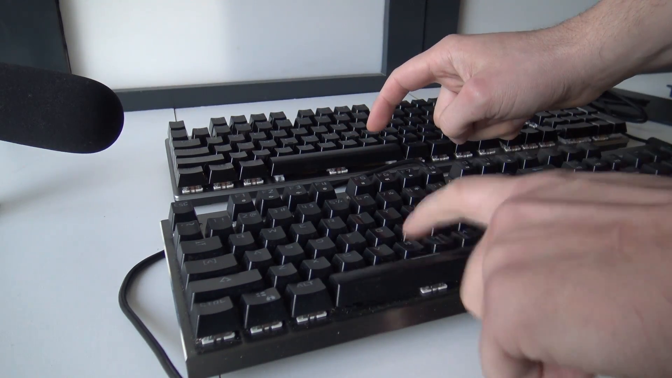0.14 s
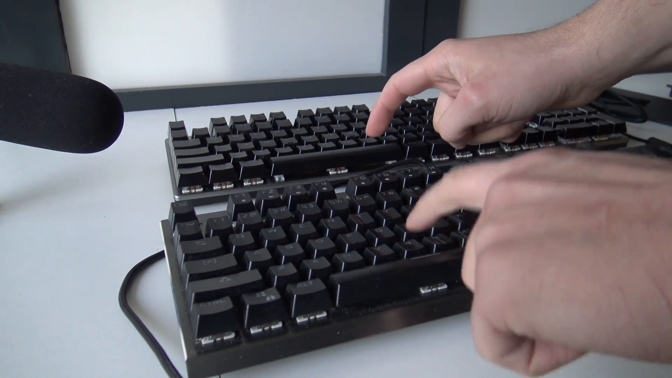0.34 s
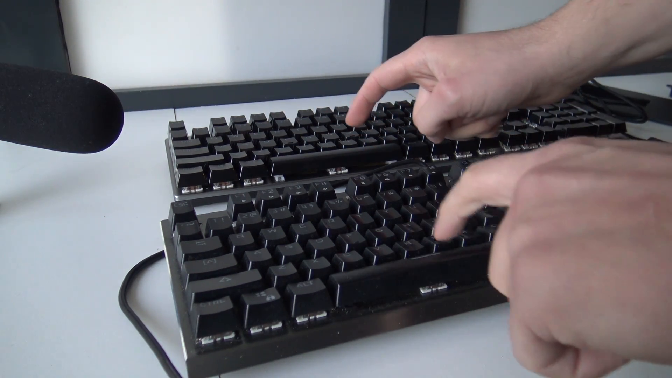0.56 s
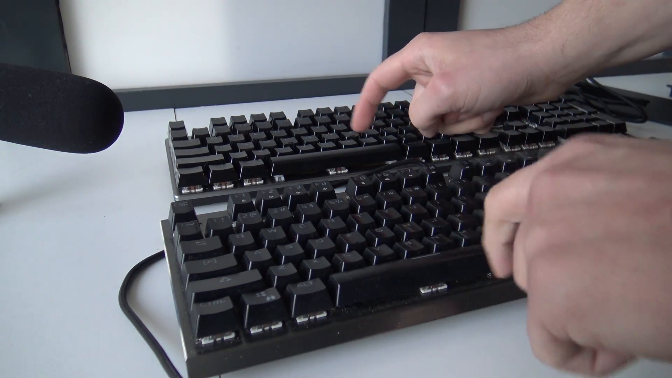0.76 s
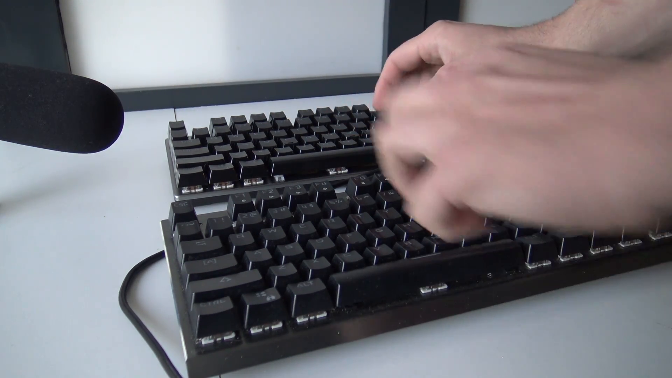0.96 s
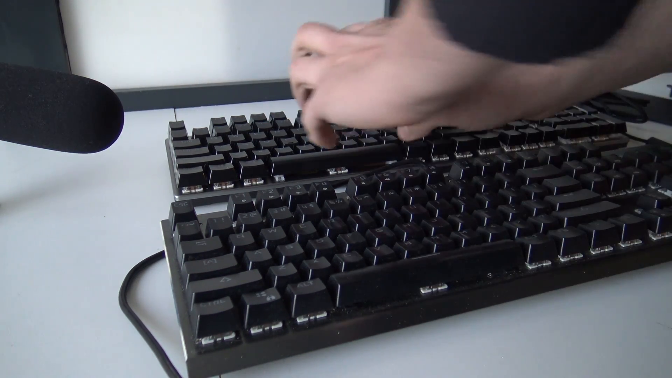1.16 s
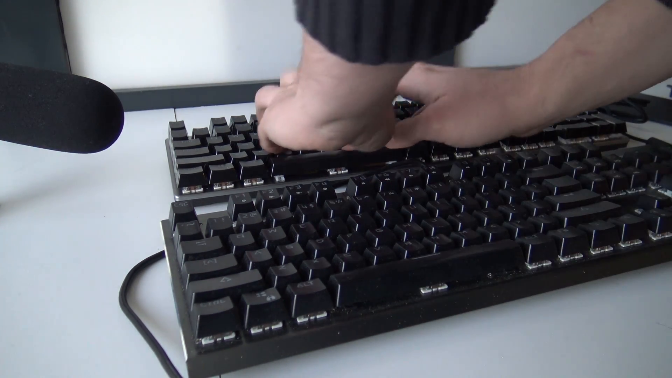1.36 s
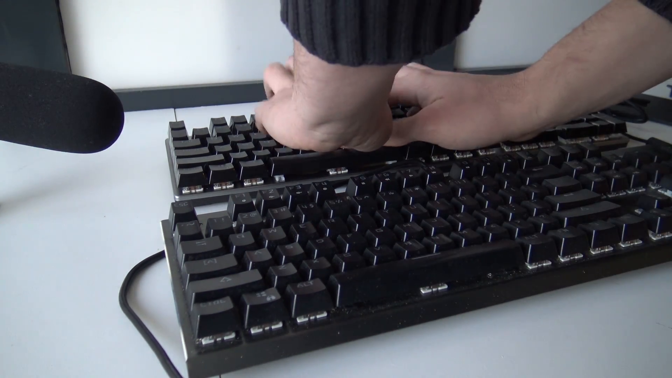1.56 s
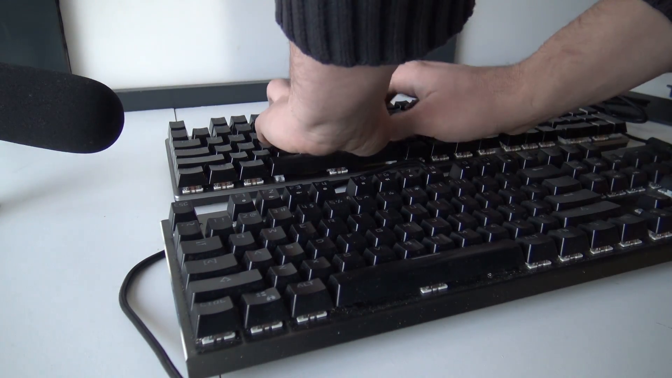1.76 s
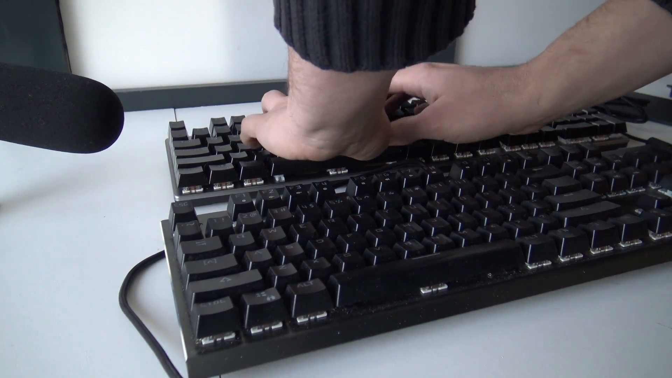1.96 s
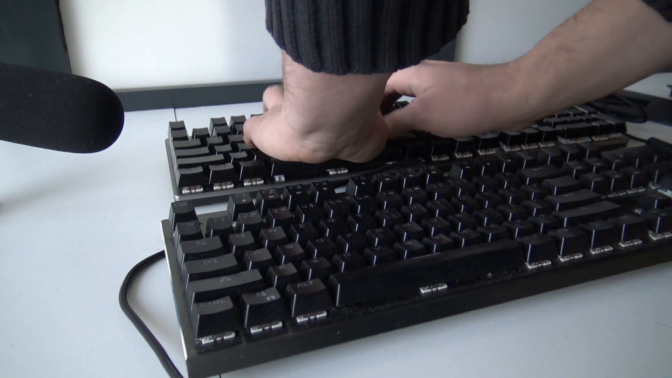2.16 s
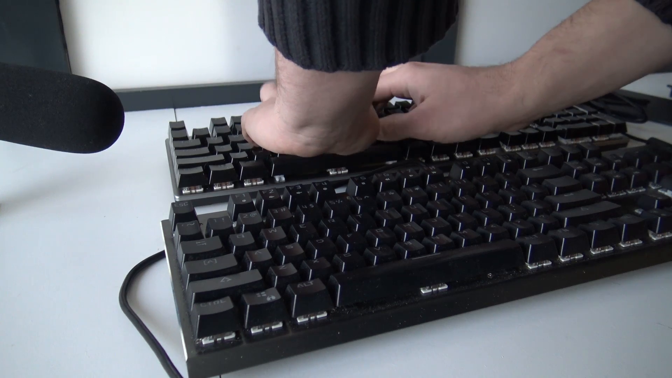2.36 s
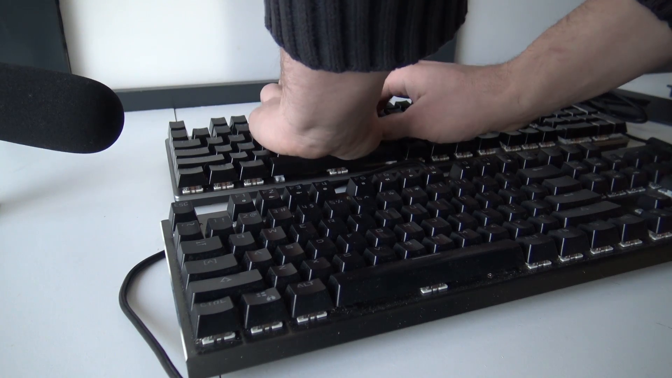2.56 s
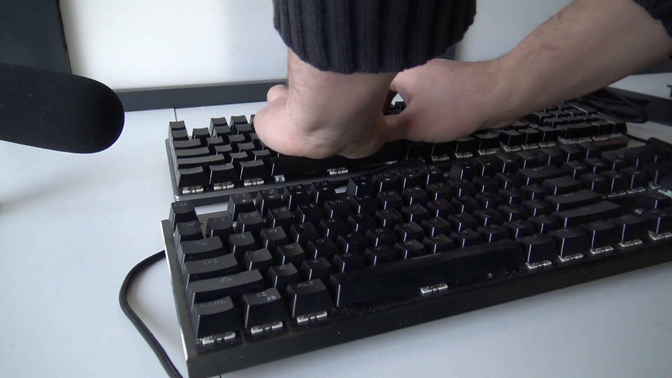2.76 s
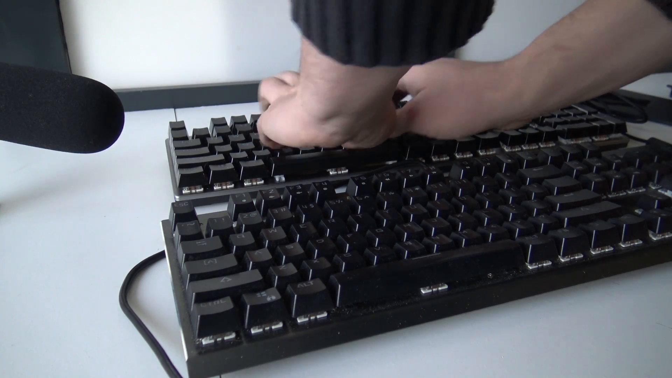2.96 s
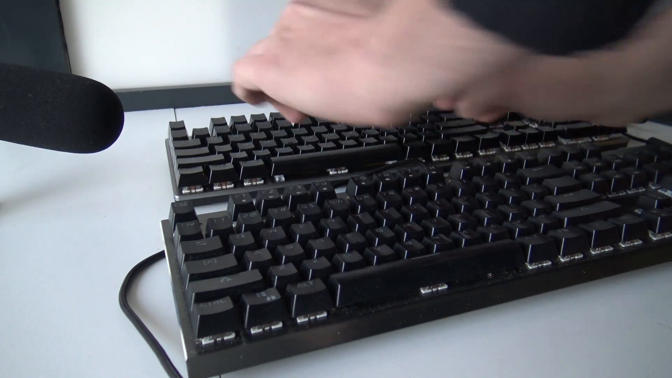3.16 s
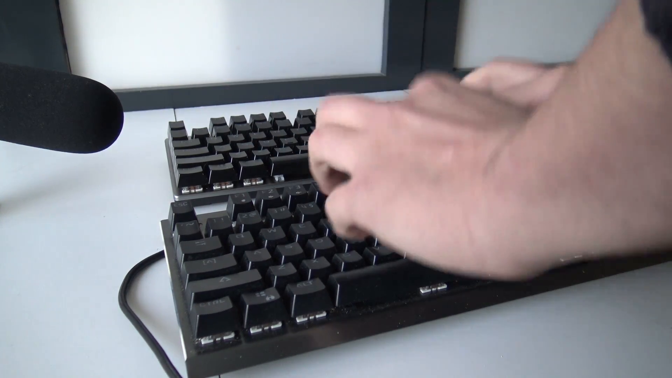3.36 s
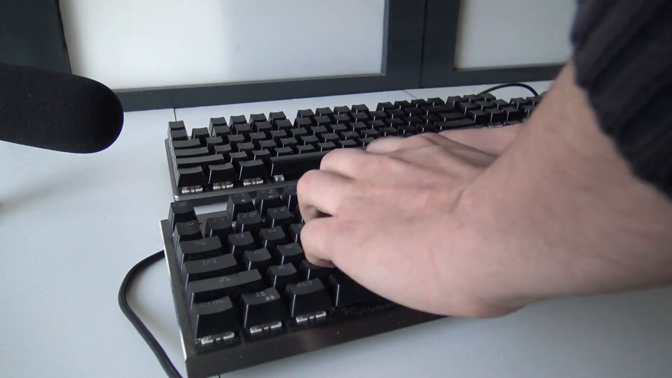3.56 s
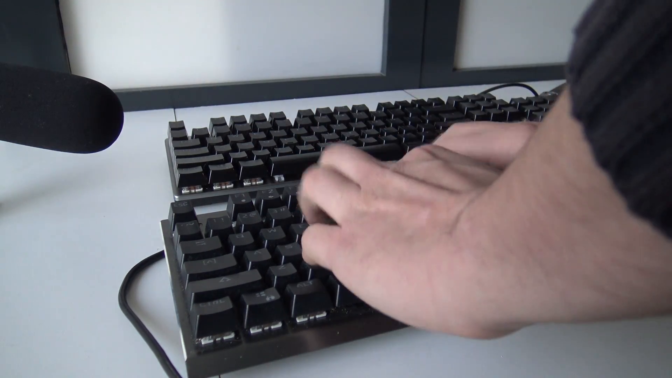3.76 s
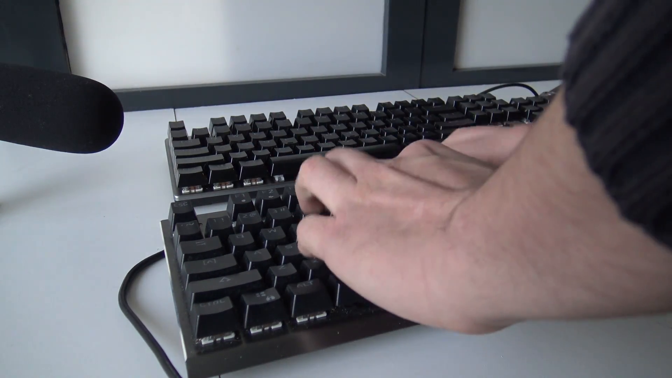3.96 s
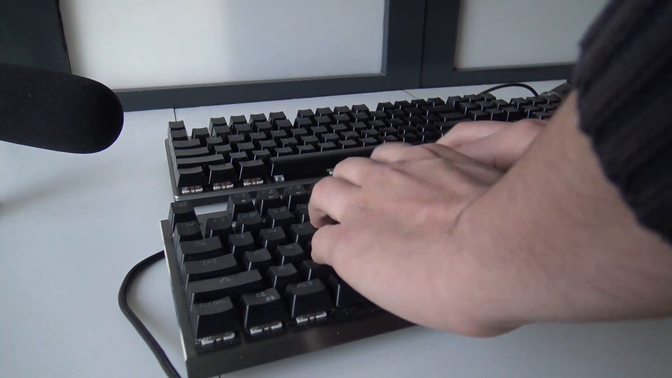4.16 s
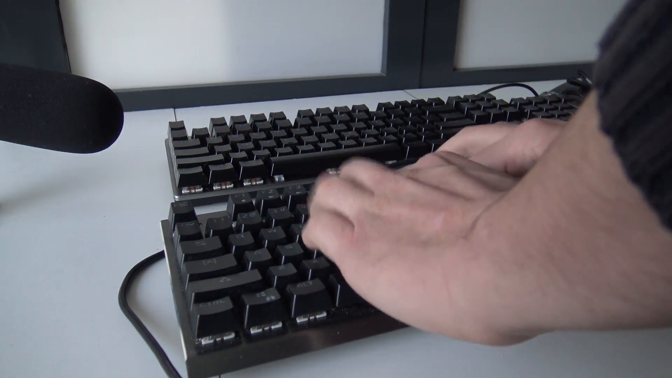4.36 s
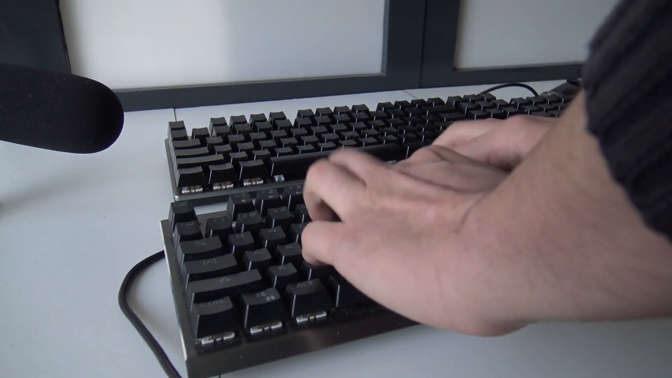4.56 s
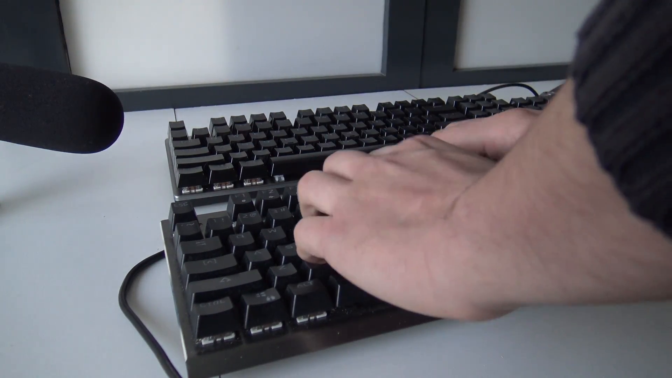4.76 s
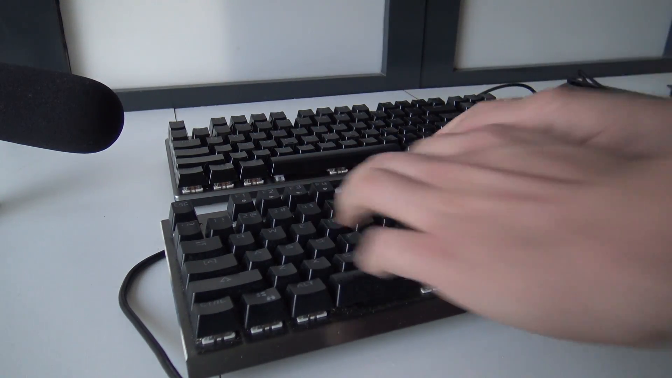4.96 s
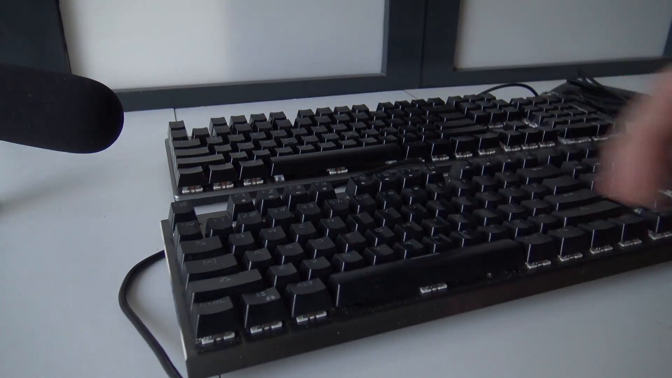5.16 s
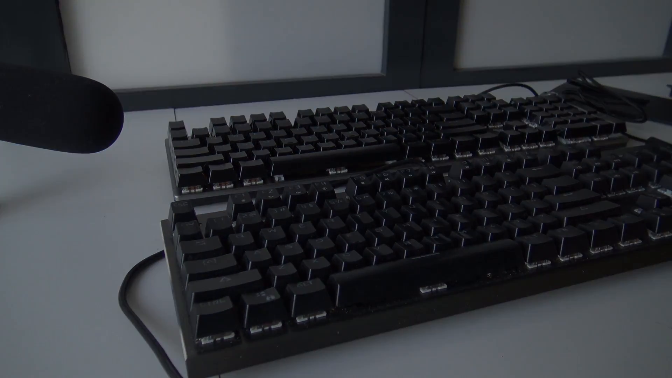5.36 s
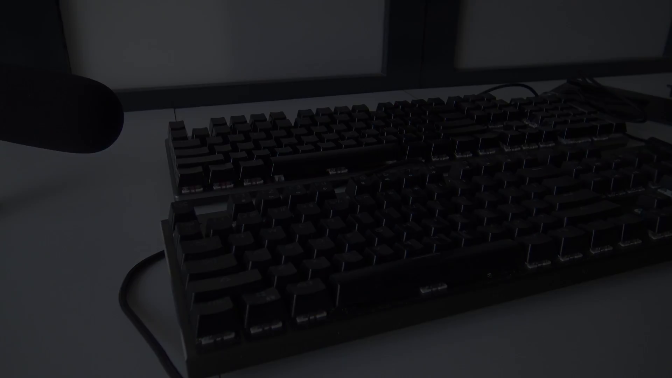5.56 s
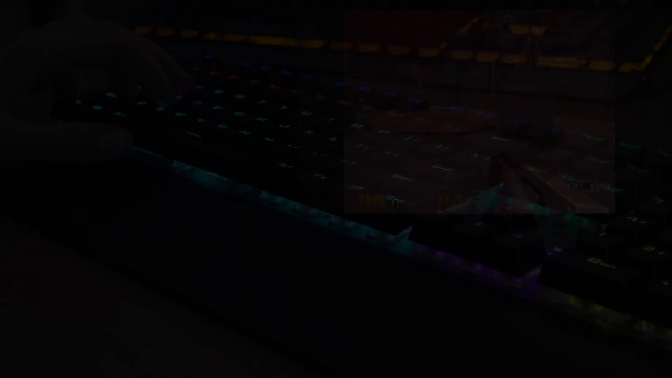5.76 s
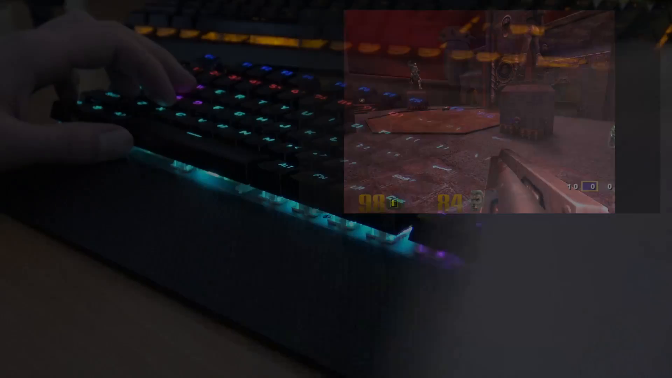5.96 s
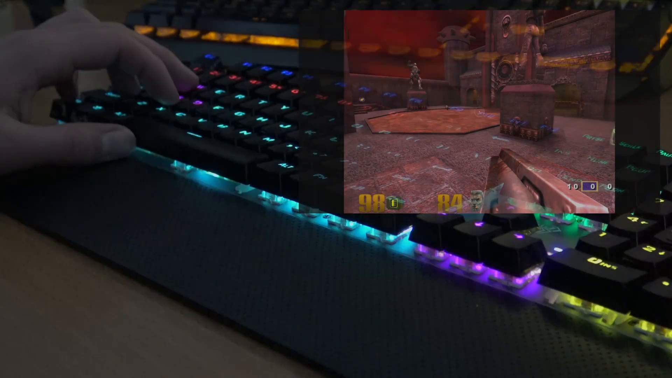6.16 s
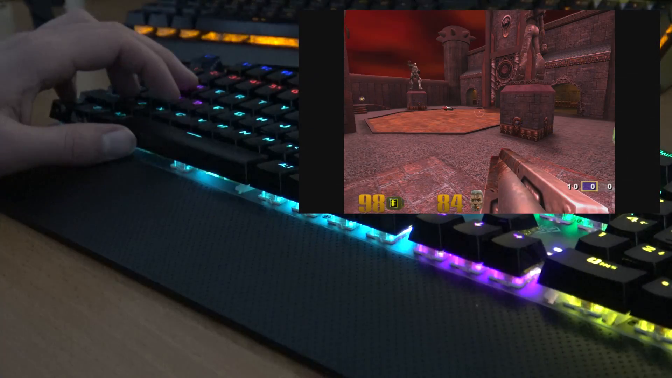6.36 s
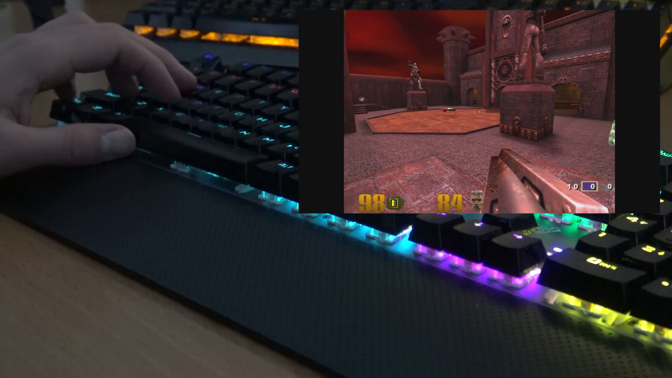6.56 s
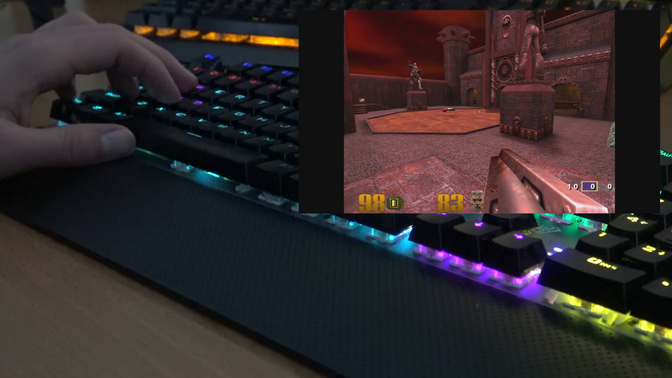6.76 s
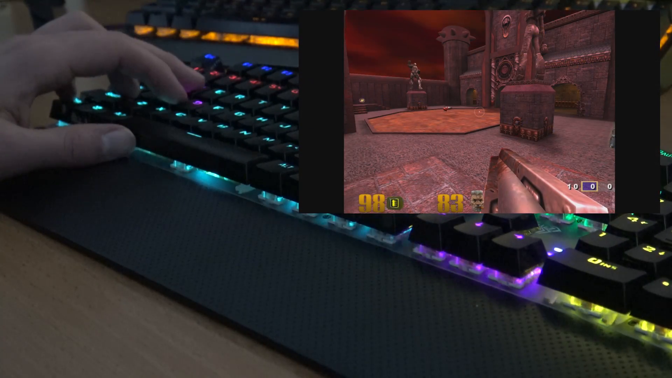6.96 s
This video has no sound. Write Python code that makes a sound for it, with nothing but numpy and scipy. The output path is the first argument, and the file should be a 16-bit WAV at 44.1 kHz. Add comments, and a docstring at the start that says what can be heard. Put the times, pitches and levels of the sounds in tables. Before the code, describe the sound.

Two hard, loud space-bar taps crack close to the microphone, each with a spring-back and desk thump. After a pause, rapid typing clatters on a duller, more distant keyboard. Another short gap, then fast, crisp typing on a nearer clicky board, with one notably heavy stroke late. It fades into soft low fan noise, with faint key presses and a thin whistling mouse slide.

```python
"""Two hard space-bar taps, then fast typing: first a far, duller keyboard, then a near, clicky one, close-miked.
The typing fades out and a quiet desk fades in: a computer fan, a few soft presses, a thinly whistling mouse.
Clicks are short shaped noise bursts with a scrape before and a room after; the bar, desk and microphone arm
are decaying sines, stirred by the keys. Hush, fan and brushes are coloured noise; the mouse is a fuzzy sine."""
import sys
import numpy as np
from scipy import signal
from scipy.fft import rfft, irfft
from scipy.io import wavfile
from scipy.ndimage import uniform_filter1d

SR = 44100
rng = np.random.default_rng(int(sys.argv[2]) if len(sys.argv) > 2 else 0)


def bounce(signal):
    """Save signal as a 16-bit WAV file at the path given by the first command-line argument."""
    frames = np.transpose(np.atleast_2d(signal))
    limited = np.clip(frames, -1, 1)
    pcm = np.round(limited * 32767).astype(np.int16)
    wavfile.write(sys.argv[1], SR, pcm)


N = 309582
LEAD = 512  # samples of scrape ahead of each contact

# taps on the space bar: [lands t/s, springs back t/s, relative level/dB]
SPACE_TAPS = [(0.1023, 0.1662, -2), (0.2694, 0.361, -2.5)]
# clacks of the far board: [t/s, relative level/dB, bright snap/dB]
FAR_KEYS = [(1.4381, -34.5, 6), (1.4535, -25.5, 1), (1.4702, -18.5, -0.5), (1.4869, -19, 0),
            (1.5441, -17.5, 4), (1.5483, -17, 0.5), (1.5911, -23, 3), (1.6176, -24, 2), (1.6757, -18, -2),
            (1.6872, -19.5, -4.5), (1.714, -26, 3.5), (1.8005, -23.5, -4), (1.8244, -20.5, 3),
            (1.8697, -20.5, -3.5), (1.9757, -20, 2), (1.985, -22, 5.5), (2.0035, -21.5, 1),
            (2.0699, -23, 0), (2.0837, -17, 1.5), (2.105, -23, 2), (2.1533, -22, -2.5), (2.2378, -23, 3.5),
            (2.279, -28, -0.5), (2.3078, -24, 4.5), (2.3169, -23.5, 4.5), (2.3362, -24, -4.5),
            (2.3625, -27, -6), (2.4283, -29.5, -0.5), (2.4402, -27, -6), (2.4589, -22.5, -13.5),
            (2.4903, -23, -0.5), (2.5808, -22, -4), (2.618, -17, -2), (2.6608, -30, -6), (2.7131, -19, -4),
            (2.7275, -22, -8), (2.771, -27.5, 6.5), (2.803, -37.5, 24), (2.846, -18.5, -4.5),
            (2.8678, -20.5, -4), (2.9658, -23, -5), (2.9876, -23.5, -1), (3.0038, -17.5, 1),
            (3.018, -18, -2.5), (3.0356, -28, 3), (3.0741, -21.5, 2.5), (3.0938, -25, 0.5)]
# strokes on the near board: [lands t/s, relative level/dB, travel from snap to landing/s]
NEAR_KEYS = [(3.577, -12.5, .002), (3.5832, -16, .003), (3.6118, -12.5, .002), (3.7067, -15, .002),
             (3.721, -13, .0065), (3.766, -21, 0.0046), (3.819, -14.5, 0.0044), (3.894, -20, .0132),
             (3.9173, -14.5, .002), (3.9464, -12, .002), (4.031, -16.5, .003), (4.0507, -22, 0.0018),
             (4.127, -23.5, 0.0023), (4.1572, -14.5, .004), (4.163, -11.5, .008), (4.25, -21, .007),
             (4.2801, -16.5, .002), (4.335, -17.5, .002), (4.3486, -12.5, 0.016), (4.4674, -20, 0.015),
             (4.4847, -20, .002), (4.5274, -26, 0.0019), (4.6309, -15.5, 0.0077), (4.6477, -16, 0.0019),
             (4.7727, -3.5, 0.0034), (4.8922, -13, 0.0055), (4.9214, -27, 0.0035), (4.9706, -13, 0.006),
             (5.0314, -31, 0.0088)]
# colour of the space bar's clicks: [f/Hz, relative level/dB]
SPACE_TONE = [(150, -15.5), (500, -15), (660, -21), (950, -18.5), (1400, -9.5), (2400, -0.5), (3900, -8),
              (5400, -5), (7000, -13), (8400, -13.5), (10500, -20.5), (16000, -37.5)]
# the long space bar and its springs ring on: [f/Hz, relative level/dB, t60/s]
BAR_MODES = [(200, 5, .14), (285, 9, .08), (330, 7, .09), (430, 4, .06), (476, -4, .3), (520, -6, .22),
             (556, -25, 1.6), (662, -30, 1.1), (740, -32, 1.5)]
# colour of the room's reflections: [f/Hz, level/dB]
ROOM_TONE = [(150, -0.5), (600, 4.5), (1500, -5), (3500, -5.5), (6000, -9.5), (9000, -10), (15000, -9)]


def gain_of(db):
    """Decibels to an amplitude factor."""
    return 10 ** (np.asarray(db) / 20)


def unit_rms(x):
    """Scales to rms 1."""
    return x / np.sqrt(np.mean(x ** 2) + 1e-20)


def read(points, hz):
    """Reads a table along a log-frequency axis."""
    f, value = np.transpose(points)
    return np.interp(np.log(hz + 1), np.log(f + 1), value)


def curve(rows, axis=1):
    """One column of a timed table, sample by sample."""
    rows = np.array(rows)
    return np.interp(np.arange(N) / SR, rows[:, 0], rows[:, axis])


def add(mix, s, sound):
    """Mixes a sound in at a time in seconds."""
    part = mix[max(round(s * SR), 0):][:len(sound)]
    part += sound[:len(part)]


def noise(colour_db, size):
    """Noise of rms 1 whose spectrum follows a rule."""
    white = rng.standard_normal(size)
    gain = gain_of(colour_db(np.fft.rfftfreq(size, 1 / SR)))
    return unit_rms(irfft(rfft(white) * gain, size))


def ring(modes, size):
    """Decaying sines of a struck body."""
    t = np.arange(size) / SR
    return sum(gain_of(db - 60 * t / t60) * np.sin(2 * np.pi * hz * t) for hz, db, t60 in modes)


def dying_tap(room_db=-30, t60=0.29, bar_db=-40, thud_db=-20):
    """Room, space bar and desk still ring from an earlier tap."""
    decay_db = -60 * np.arange(N) / SR / t60
    air = noise(lambda hz: read(SPACE_TONE, hz) + read(ROOM_TONE, hz) * 2, N)
    return air * gain_of(room_db + decay_db) + gain_of(bar_db) * ring(BAR_MODES, N) + desk([(0, thud_db)])


def desk(pushes, shudder_db=-12, shudder_s=0.024):
    """Each push rings the low modes of the desk and its cases, with a short dull shudder."""
    # modes of the desk and the cases on it: [f/Hz, relative level/dB, t60/s]
    desk_modes = [(45, -1, .18), (66, -10, 0.25), (109, 5.5, .27), (123, -5, 0.14), (208, -12, 0.25),
                  (302, -19, 0.27)]
    shudder_tone = [(25, -2.5), (50, -1.5), (200, -5.5), (450, -18.5), (1500, -62)]
    out = np.zeros(N)
    t = np.arange(2 * SR) / SR
    thud = ring(desk_modes, len(t)) * (1 - np.exp(-t / 0.0046))  # a soft onset
    short_t = t[:SR // 3]
    for s, db in pushes:
        shudder = noise(lambda hz: read(shudder_tone, hz), len(short_t))
        add(out, s, gain_of(db) * thud)
        add(out, s, gain_of(db + shudder_db) * shudder * np.exp(-short_t / shudder_s))
    return out


def hush():
    """The quiet bed under the typing: steady coloured noise."""
    # spectrum of the bed: [f/Hz, relative level/dB]
    hush_tone = [(29, -35), (50, -4), (98, -1.5), (461, -14.5), (559, -14.5), (601, -17), (746, -16.5),
                 (2620, -25), (8750, -31), (16000, -39.5)]
    return gain_of(-58.5) * noise(lambda hz: read(hush_tone, hz), N)


def fan():
    """The computer fan: a steady, mostly low noise."""
    # spectrum of the fan: [f/Hz, relative level/dB]
    fan_tone = [(12, -30), (20, -2), (113, -5.5), (182, -13), (301, -11.5), (357, -18), (459, -17),
                (1330, -30.5), (2200, -29.5), (8890, -44.5), (16000, -59)]
    return gain_of(-51.5) * noise(lambda hz: read(fan_tone, hz), N)


def minimum_phase(gain):
    """The sharpest-starting impulse response with this magnitude."""
    log_gain = np.log(np.maximum(gain, 1e-6))
    circle = np.r_[log_gain, log_gain[-2:0:-1]]
    return np.fft.ifft(np.exp(np.conj(signal.hilbert(circle)))).real


def room(x, build_s=0.014):
    """Sparse reflections build up after the direct sound; the high treble dies first."""
    # reverberation: [f/Hz, t60/s]
    room_t60 = [(150, 0.43), (500, .27), (1400, 0.31), (3600, 0.25), (8000, .21), (15000, 0.13)]
    size = SR // 2
    taps = rng.standard_normal(size) * (rng.random(size) < 5000 / SR)  # about 5000 reflections a second
    taps *= 1 - np.exp(-(np.arange(size) / SR / build_s) ** 2)
    hz, t, z = signal.stft(taps, SR, nperseg=256)
    z = z * gain_of(-60 * t / read(room_t60, hz)[:, None])
    plain = signal.istft(z, SR, nperseg=256)[1]
    tail = signal.istft(z * gain_of(read(ROOM_TONE, hz))[:, None], SR, nperseg=256)[1]
    return signal.fftconvolve(x, tail / np.linalg.norm(plain))[:N]


def click(tone, knock_db, snap_db, ring_s, ring_db, case_db, slide_db, uneven_db,
          slide_s=0.0035, case_s=0.0082, size=2048):
    """A stem scrapes along its guide, then plastic meets plastic: a contact and a dense short ring."""
    t = (np.arange(size) - LEAD) / SR
    hz = np.fft.rfftfreq(size, 1 / SR)
    cap, case, slide, shape = rng.standard_normal((4, size))
    age = np.maximum(t, 0)
    # a bright snap of the switch buzzes up and down; a dull landing is one sharp contact
    buzz = np.clip(0.5 + snap_db / 25, .05, 1)
    cap_envelope = np.exp(-age / ring_s) * (1 - np.exp(-age / (buzz * ring_s)))
    blow = gain_of(ring_db) * unit_rms(cap * cap_envelope)
    blow += gain_of(case_db) * unit_rms(case * np.exp(-age / case_s) * (t > 0))
    blow += gain_of(slide_db) * unit_rms(slide * np.exp(-abs(t) / slide_s) * (t < 0))
    blow[LEAD] += 2 * (1 - buzz) ** 2 * np.sqrt(size)
    spectrum = rfft(blow)
    spectrum /= np.sqrt(uniform_filter1d(abs(spectrum) ** 2, size=50))  # flattened before colouring
    # every click has resonances of its own, within the broad colour of its board
    own_db = uneven_db * unit_rms(uniform_filter1d(shape[:len(hz)], size=24))
    tilt_db = read([(1000, knock_db), (1900, 0), (4000, 0.0013), (7500, snap_db)], hz)
    colour = unit_rms(gain_of(read(tone, hz * rng.uniform(0.98, 1.05)) + own_db))
    colour = colour * gain_of(tilt_db) * hz / np.hypot(hz, 120)  # less bass below 120 Hz
    sound = irfft(spectrum * rfft(minimum_phase(colour))) * np.sqrt(.005 * SR)
    return sound * signal.windows.tukey(size, .2)


def keys(contacts, tone, level_db, wet_db, rattle_db, before_s, after_s, count=6, **body):
    """Clicks, the weak ticks of fingertips and loose keycaps around each, and the room's answer."""
    direct, outward = np.zeros((2, N))
    rattles = [click(tone, -snap_db, snap_db, **body) for snap_db in np.linspace(-10, 6, num=24)]
    usual_db = np.mean([row[1] for row in contacts])
    for s, db, knock_db, snap_db in contacts:
        start = s - LEAD / SR
        for path in (direct, outward):  # the fine colour differs with direction
            add(path, start, gain_of(db + level_db) * click(tone, knock_db, snap_db, **body))
        for when, weakness, which in rng.random((count, 3)):
            # loose parts rattle nearly as much under a light stroke as under a hard one
            tick_db = (db + usual_db) / 2 + rattle_db - 10 * weakness
            tick = gain_of(tick_db) * rattles[int(which * len(rattles))]
            add(direct, start - before_s + when * (before_s + after_s), tick)
    return direct + gain_of(wet_db) * room(outward)


def contact(s, db, knock_db, snap_db):
    """One meeting of two parts of a key: its time, level, hollow knock and bright snap."""
    return s, db, knock_db, snap_db


def space_bar_contacts(down_s=.0034, up_s=.0115):
    """Each tap: the switch snaps, the bar lands, the switch snaps back, the bar hits its top stop."""
    parts = []
    for lands, back, db in SPACE_TAPS:
        parts += [contact(lands - down_s, db - 16, knock_db=8.5, snap_db=6),
                  contact(lands, db, knock_db=-1.5, snap_db=-2.5),
                  contact(back - up_s, db - 29, knock_db=-3.5, snap_db=6),
                  contact(back, db - 17.0, knock_db=10.5, snap_db=3.0)]
    return parts


def space_bar():
    """The clicks of the space bar, with faint loose ticks close around each."""
    return keys(space_bar_contacts(), SPACE_TONE, level_db=3.5, wet_db=-8, rattle_db=-17.0, before_s=.007,
                after_s=.005, ring_s=.0011, ring_db=5.5, case_db=-8.5, slide_db=-20, uneven_db=2.0)


def bar_ring(press_db=-40, release_db=-28):
    """The space bar rings when it lands, and more when it springs back."""
    out, sound = np.zeros(N), ring(BAR_MODES, 2 * SR)
    for lands, back, _ in SPACE_TAPS:
        add(out, lands, gain_of(press_db) * sound)
        add(out, back, gain_of(release_db) * sound)
    return out


def bar_pushes(lag_s=.013, press_db=-12.5, release_db=-22):
    """The space bar pushes the desk as it lands, and less as it springs back: (s, dB)."""
    pushes = []
    for lands, back, db in SPACE_TAPS:
        pushes += [(lands + lag_s, db + press_db), (back + lag_s / 2, db + release_db)]
    return pushes


def arm_sway(pushes, level_db, lag_s=0.05, per_db=.5):
    """Each push on the desk sets the microphone arm swinging a moment later."""
    # slow modes of the arm: [f/Hz, relative level/dB, t60/s]
    arm_modes = [(23.2, -29, 1.6), (31, -24.5, 0.77)]
    out, swing = np.zeros(N), gain_of(level_db) * ring(arm_modes, 2 * SR)
    for (s, db), lag in zip(pushes, rng.random(len(pushes))):
        add(out, s + lag * lag_s, gain_of(per_db * db) * swing)
    return out


def brushes(grain_db=3):
    """Soft, grainy swishes of hands, sleeve and mouse: band noise under a bell-shaped envelope."""
    # swishes: [centre t/s, half length/s, level/dB, centre f/Hz, half width at -4 dB/octaves]
    swishes = [(0.934, 0.059, -68, 8940, 1), (1.268, 0.32, -69, 5500, 0.73),
               (1.425, 0.098, -53.5, 2873, 0.99), (3.177, 0.3, -70, 4980, 0.56),
               (3.552, 0.019, -47, 3900, 2.1), (5.35, 0.46, -74, 2950, 0.916),
               (6.585, 0.058, -67.5, 11500, 0.26), (6.739, 0.14, -60, 2460, 0.69)]
    out = np.zeros(N)
    for s, half_s, db, centre_hz, octaves in swishes:
        size = 2 * int(half_s * SR)
        swish = noise(lambda hz: -np.minimum(4 * (np.log2((hz + 1) / centre_hz) / octaves) ** 2, 40), size)
        wander = unit_rms(uniform_filter1d(rng.standard_normal(size), size=200))
        grain = gain_of(grain_db * wander)
        add(out, s - half_s, gain_of(db) * unit_rms(swish * grain) * np.hanning(size))
    return out


def plain_contacts(rows, knock_db, knock_per_snap):
    """A plain switch gives one clack; the brighter its snap, the less hollow its knock."""
    return [contact(s, db, knock_db - knock_per_snap * snap_db, snap_db) for s, db, snap_db in rows]


def fidgets(rows, per_s, level_db, spread_db=3, snap_db=4):
    """All through a run of typing, fingers touch and leave keycaps between the strokes."""
    first, last = rows[0][0], rows[-1][0]
    times = np.arange(first, last - 1 / per_s, 1 / per_s)
    draws = rng.random((len(times), 3))
    return [contact(s + late / per_s, level_db + spread_db * (2 * force - 1), 0, snap_db * 2 * bright)
            for s, (late, force, bright) in zip(times, draws)]


def far_board():
    """The duller board: single clacks, with light touches between them."""
    # colour of its clicks: [f/Hz, relative level/dB]
    far_tone = [(150, -5.5), (550, -23.5), (850, -19.5), (1150, -6), (1600, -6), (2200, 0.5), (3000, -4),
                (4200, -10), (5800, -11), (7500, -14.5), (8250, -15.5), (9600, -27), (16000, -44)]
    clacks = plain_contacts(FAR_KEYS, knock_db=0.0, knock_per_snap=0.34)
    return keys(clacks + fidgets(FAR_KEYS, per_s=12, level_db=-38), far_tone,
                level_db=4.5, wet_db=-8.0, rattle_db=-6.0, before_s=.012, after_s=.03,
                ring_s=0.0011, ring_db=-2.0, case_db=-7.5, slide_db=-17.5, uneven_db=3.5)


def springs(clatter, level_db, hz, width_hz, t60):
    """The springs of a board, all nearly alike, ring thinly on after the clicks."""
    t = np.arange(SR // 2) / SR
    ping = noise(lambda f: -20 * np.log10(1 + ((f - hz) / width_hz) ** 2), len(t)) * gain_of(-60 * t / t60)
    return gain_of(level_db) * signal.fftconvolve(clatter, ping / np.linalg.norm(ping))[:N]


def hand_pushes(hand_s=.05, lag_s=.008, thud_db=-16.5, thud_per_db=0.58):
    """The hardest landing within hand_s pushes the desk a moment later, more when harder: (s, dB)."""
    # how heavily the hands come down on the desk: [t/s, level/dB]
    weight = [(1.48, 4.5), (1.6, -1), (2.05, -1.5), (2.25, -7), (2.55, -0.5), (2.8, -8), (2.95, 2),
              (3.02, -5), (3.1, -14), (3.6, -1), (3.95, 1), (4.35, -3), (4.8, 0), (5.05, -11)]
    landings = [row[:2] for row in FAR_KEYS + NEAR_KEYS]
    pushes = []
    for s, db in landings:
        if all(db >= other_db for other_s, other_db in landings if abs(other_s - s) < hand_s):
            weight_db = np.interp(s, *np.transpose(weight))
            pushes.append((s + lag_s, thud_db + thud_per_db * db + weight_db))
    return pushes


def clicky_contacts(leaf_db=-13, leaf_per_db=.75, hollow_per_db=0.68, rebound_s=.007, rebound_db=-11):
    """A clicky switch snaps brightly, the key lands (hollower when soft) and rebounds; lone snaps fall between."""
    # lone bright snaps of the switches: [t/s, relative level/dB]
    lone_snaps = [(3.654, -23), (3.865, -21.5), (3.9874, -28.5), (3.9979, -22.5), (4.0099, -24.5),
                  (4.141, -25.5), (4.2326, -29), (4.2427, -29), (4.2917, -28), (4.3901, -27), (4.4535, -21),
                  (4.4741, -30), (4.5988, -24), (4.615, -23.5), (4.877, -29)]
    usual_db = np.mean([db for _, db, _ in NEAR_KEYS])
    parts = []
    for s, db, travel in NEAR_KEYS:
        parts += [contact(s - travel, leaf_db + leaf_per_db * db, knock_db=4, snap_db=10.5),
                  contact(s, db, knock_db=1 - hollow_per_db * (db - usual_db), snap_db=-10),
                  contact(s + rebound_s, db + rebound_db, knock_db=6, snap_db=-11.5)]
    return parts + [contact(s, db, knock_db=-12, snap_db=12.0) for s, db in lone_snaps]


def near_board():
    """The clicky board: snap, landing and rebound, with light touches between them."""
    # colour of its clicks: [f/Hz, relative level/dB]
    near_tone = [(150, -5), (450, -16), (750, -7.5), (950, -11), (1300, 2.5), (2100, -1), (2900, -0.5),
                 (4400, -8.5), (7000, -9.5), (7800, -9), (8350, -3), (9200, -12), (11500, -24.5),
                 (16000, -35.5)]
    return keys(clicky_contacts() + fidgets(NEAR_KEYS, per_s=10, level_db=-36.5), near_tone,
                level_db=3.5, wet_db=-12, rattle_db=-11.5, before_s=0.012, after_s=0.027,
                ring_s=0.00098, ring_db=2.5, case_db=-11.0, slide_db=-14, uneven_db=3.0)


def typing_desk():
    """The space bar, the two boards, and the desk and microphone arm that they shake."""
    far = far_board()
    pings = springs(far, level_db=-29, hz=8200, width_hz=160, t60=.5)
    hands, thumps = hand_pushes(), bar_pushes()
    thuds = desk(hands, shudder_db=-8, shudder_s=0.049) + desk(thumps)
    sway = arm_sway(hands, level_db=15) + arm_sway(thumps, level_db=5)
    return space_bar() + bar_ring() + dying_tap() + far + near_board() + pings + thuds + sway + hush()


def soft_presses():
    """A few soft clacks at the quiet desk, with a longer, stronger ring."""
    # presses: [t/s, relative level/dB, bright snap/dB]
    presses = [(6.012, -74, 2), (6.036, -66.5, -2), (6.143, -61, -13), (6.16, -60, -12), (6.919, -47, -3),
               (6.929, -53.5, -7)]
    # colour of their clicks: [f/Hz, relative level/dB]
    soft_tone = [(200, -21), (800, -25), (1300, 0.5), (2000, -2), (2800, 4), (3200, -8), (3900, -2.5),
                 (5000, -17), (7500, -8.5), (8300, -33), (16000, -30)]
    return keys(plain_contacts(presses, knock_db=-2, knock_per_snap=0.7), soft_tone,
                level_db=4.0, wet_db=1.5, rattle_db=-3.5, before_s=0.00104, after_s=0.055,
                ring_s=.003, ring_db=15, case_db=-9, slide_db=-8.5, uneven_db=2.0)


def mouse_whistle(width_hz=70):
    """The mouse feet cross the weave of the mat: a fuzzy, broken line that glides up, then down."""
    # whistle: [t/s, f/Hz, level/dB]
    glide = [(6.16, 8300, -80), (6.255, 9100, -82), (6.285, 9330, -76), (6.325, 9300, -76),
             (6.355, 8820, -78), (6.42, 8750, -78), (6.56, 7860, -76), (6.7, 6940, -86.5)]
    t = np.arange(N) / SR
    grip = noise(lambda hz: -20 * np.log10(1 + (hz / width_hz) ** 2), N)  # slow noise breaks up the tone
    moving = (t > glide[0][0]) & (t < glide[-1][0])
    tone = np.sqrt(2) * np.sin(2 * np.pi * np.cumsum(curve(glide)) / SR)
    return moving * grip * gain_of(curve(glide, axis=2)) * tone


def scene():
    """The typing desk fades out and the fan fades in; brushes, soft presses and mouse bypass the faders."""
    # fader of the typing desk: [t/s, gain]
    fade_out = [(5.1, 0.53), (5.5, 0.22), (5.78, 0)]
    # fader of the fan: [t/s, gain]
    fade_in = [(5.78, 0.013), (6, 0.2), (6.2, 0.52), (6.7, 1)]
    typing = typing_desk() * curve(fade_out)
    air = fan() * curve(fade_in)
    return (typing + brushes() + air + soft_presses() + mouse_whistle())[None]


def record(dry):
    """Peaks beyond full scale clip as the input overloads; then a steep low-pass limits the band."""
    edge_hz = 16100
    clipped = np.clip(dry, -1, 1)
    low_pass = signal.firwin(511, edge_hz, window=("kaiser", 9), fs=SR)
    return signal.oaconvolve(clipped, low_pass[None], "same")


dry = scene()
out = record(dry)
bounce(out)
```